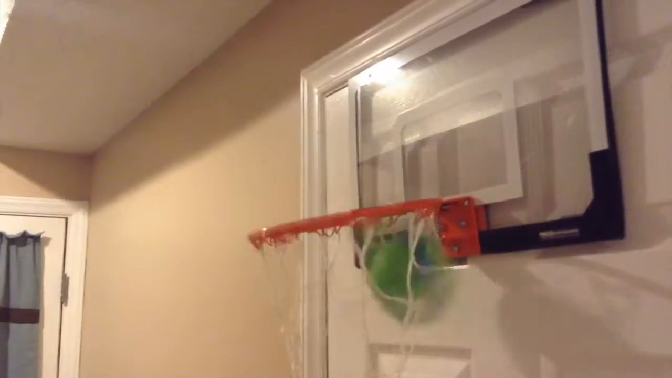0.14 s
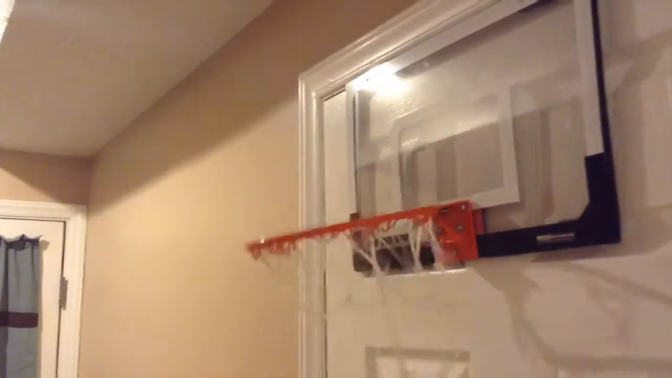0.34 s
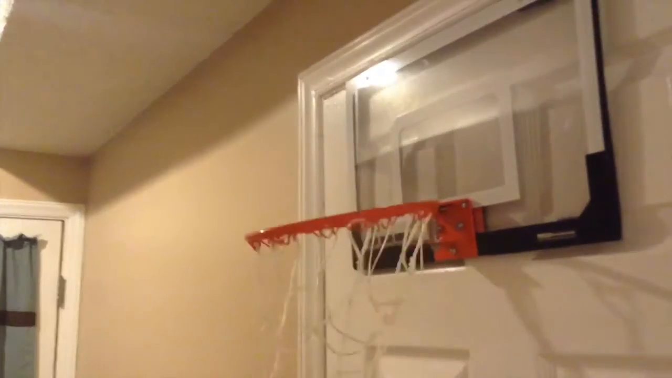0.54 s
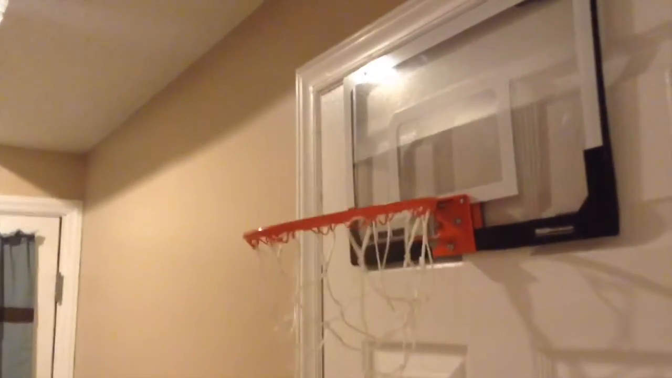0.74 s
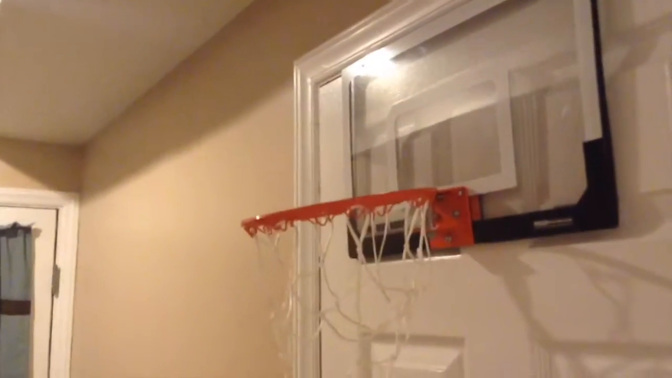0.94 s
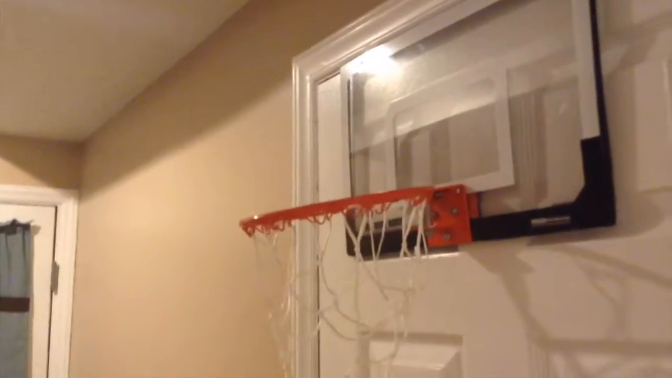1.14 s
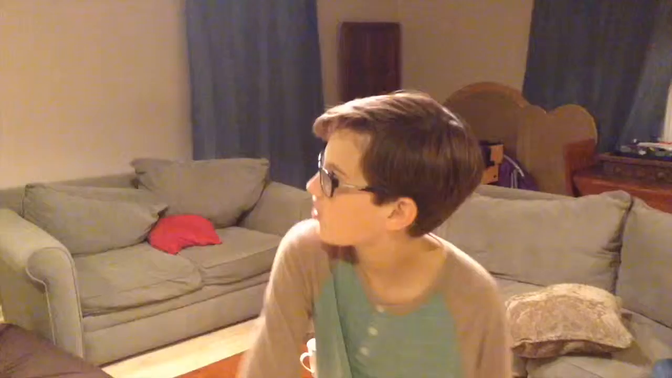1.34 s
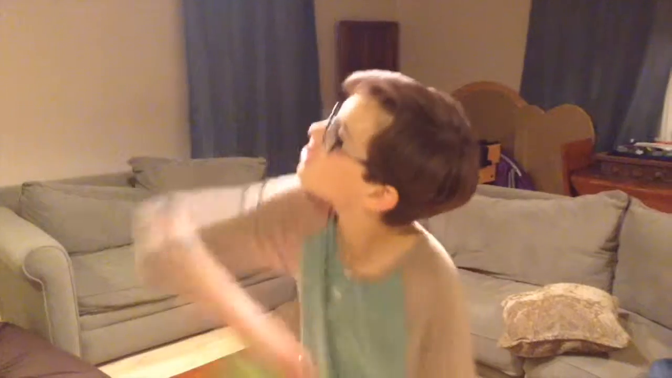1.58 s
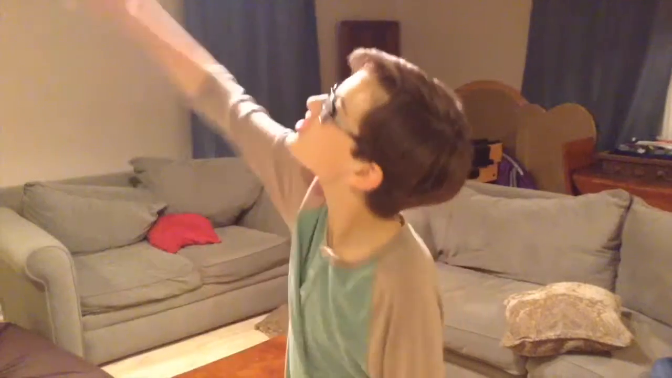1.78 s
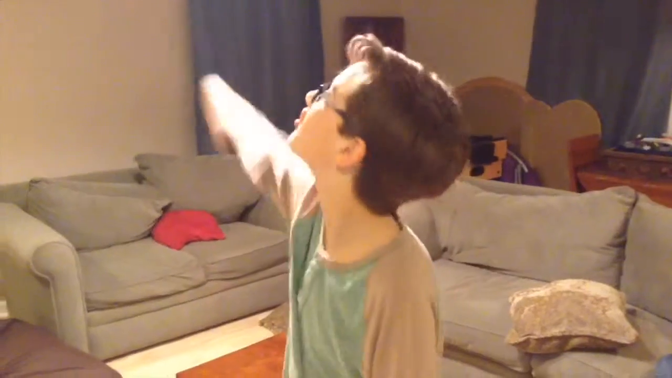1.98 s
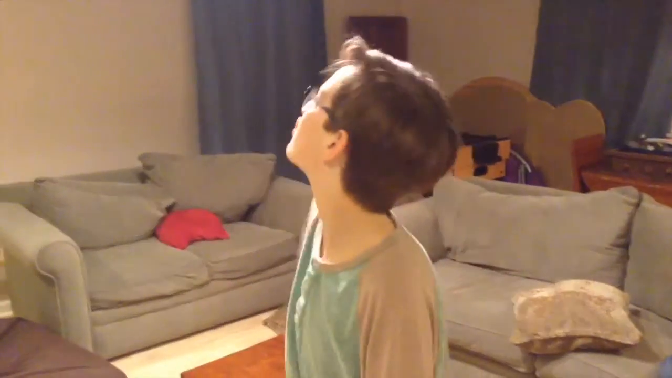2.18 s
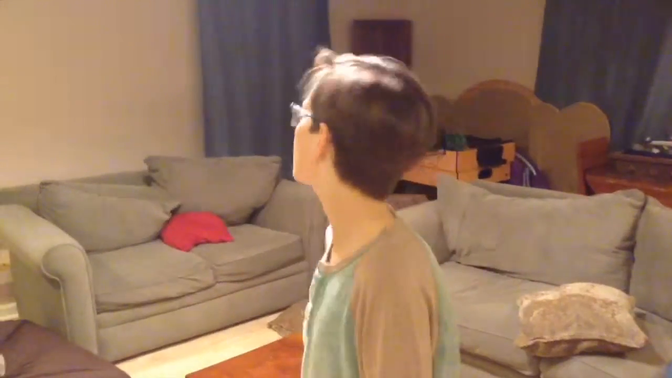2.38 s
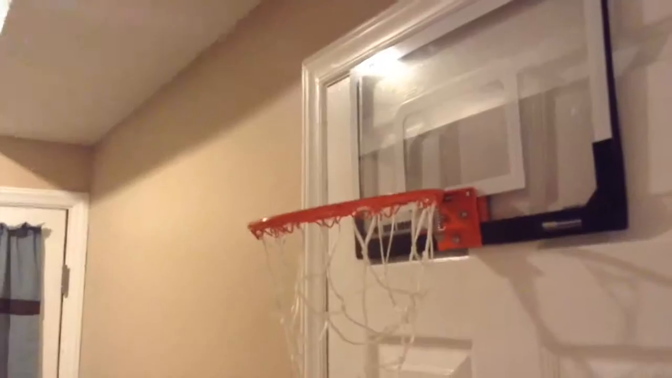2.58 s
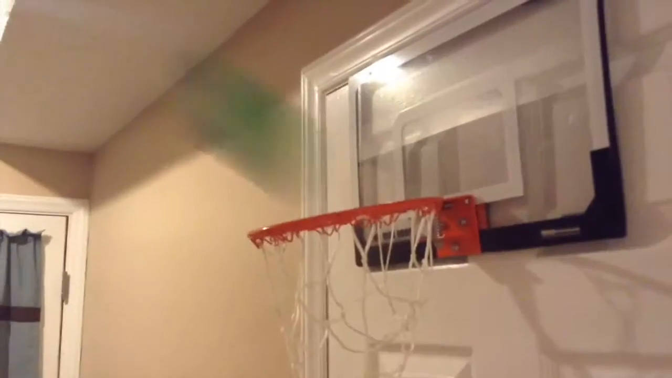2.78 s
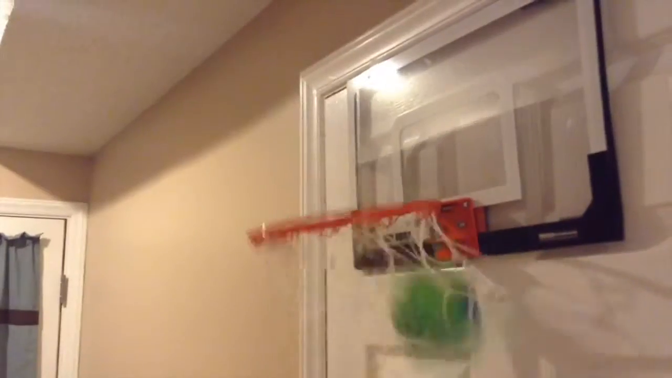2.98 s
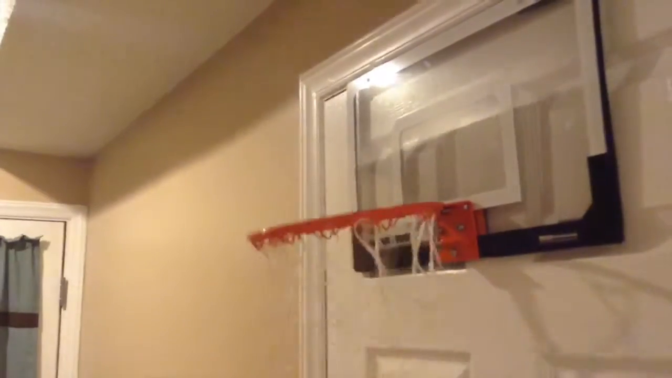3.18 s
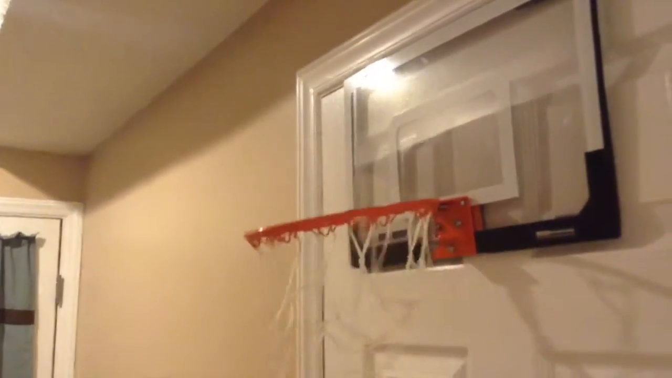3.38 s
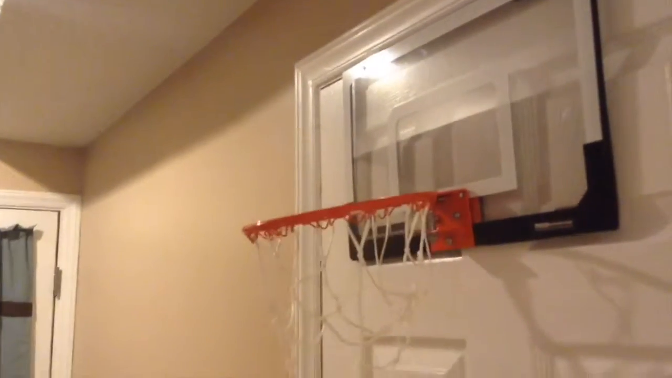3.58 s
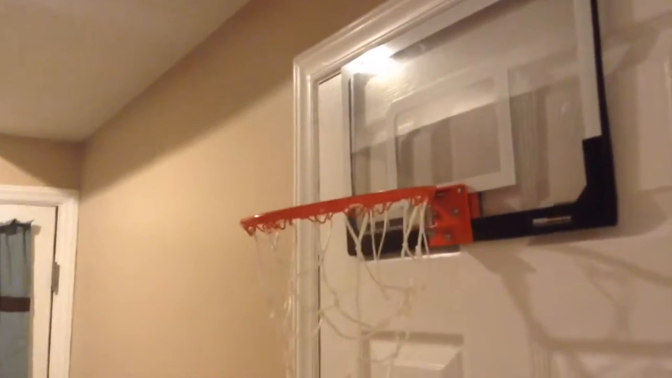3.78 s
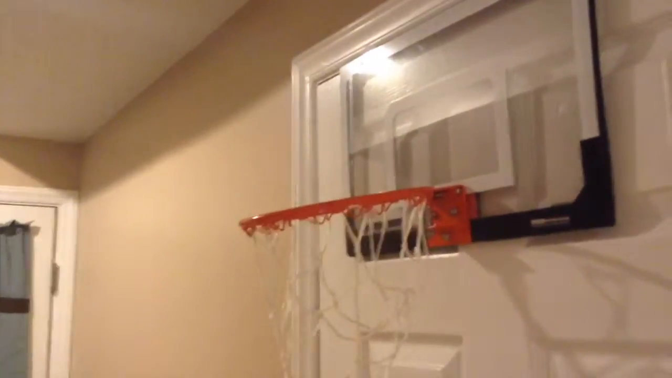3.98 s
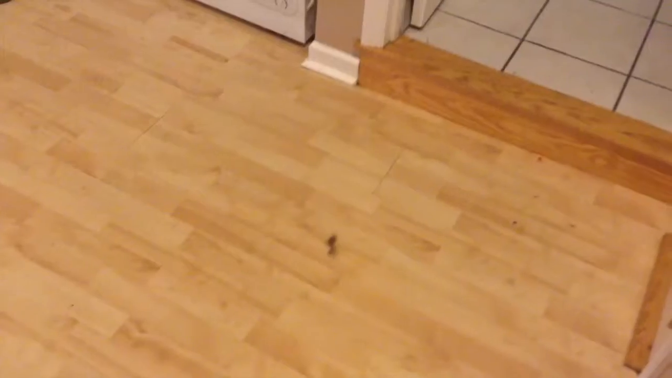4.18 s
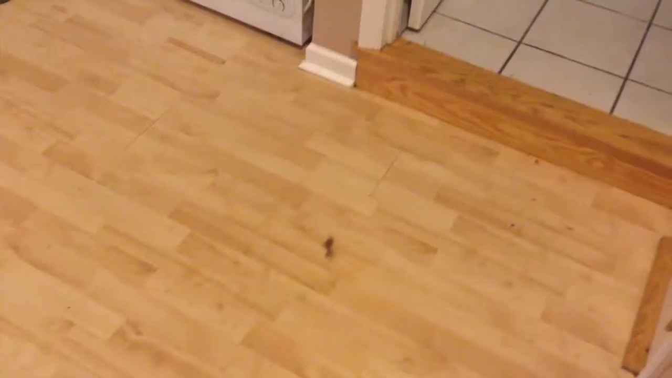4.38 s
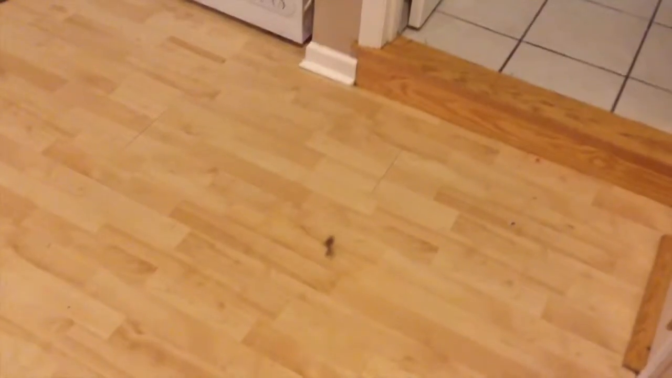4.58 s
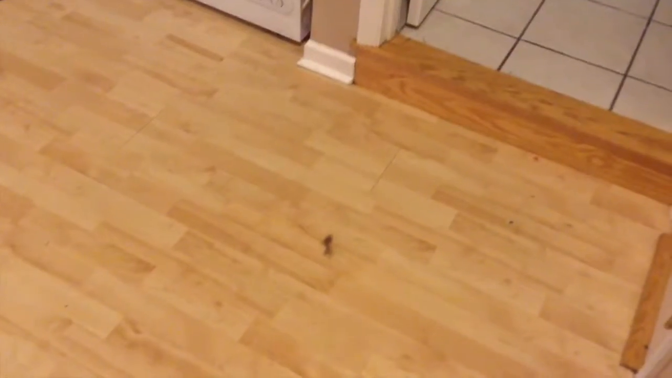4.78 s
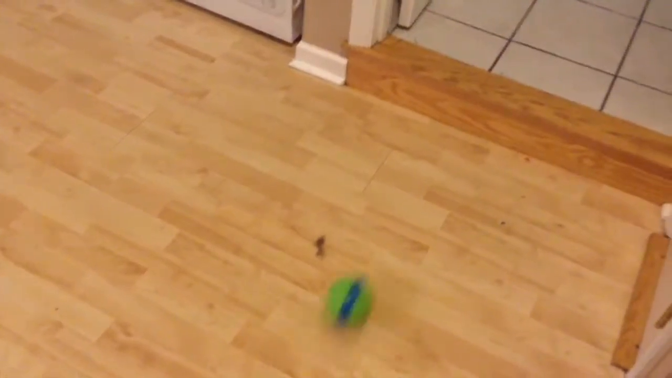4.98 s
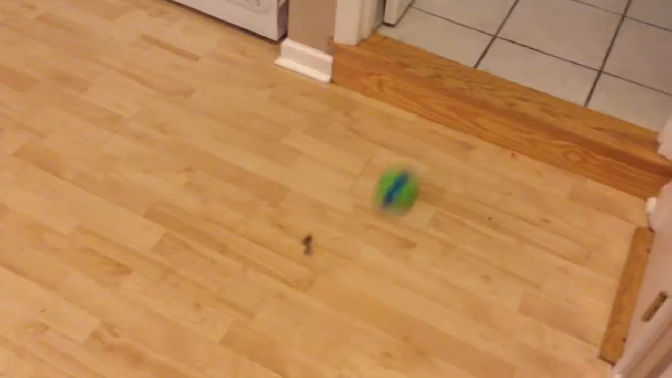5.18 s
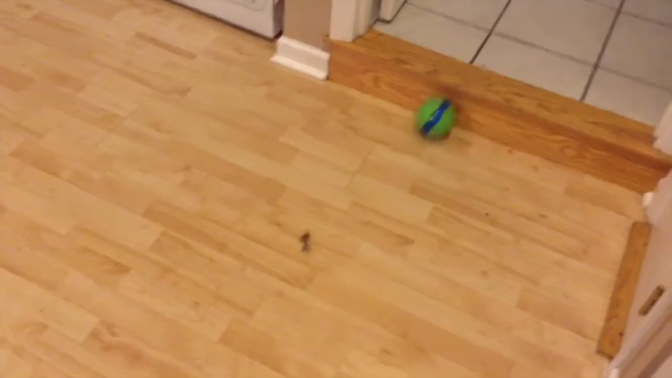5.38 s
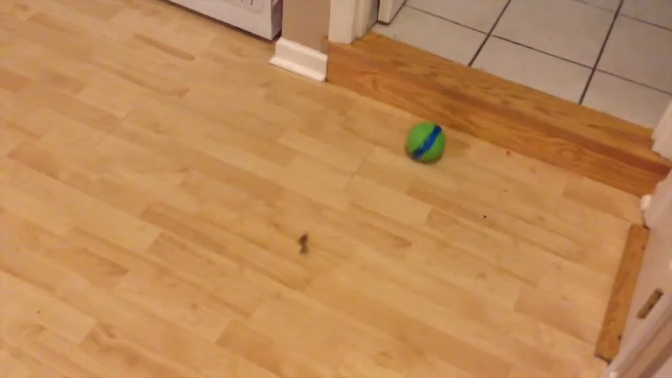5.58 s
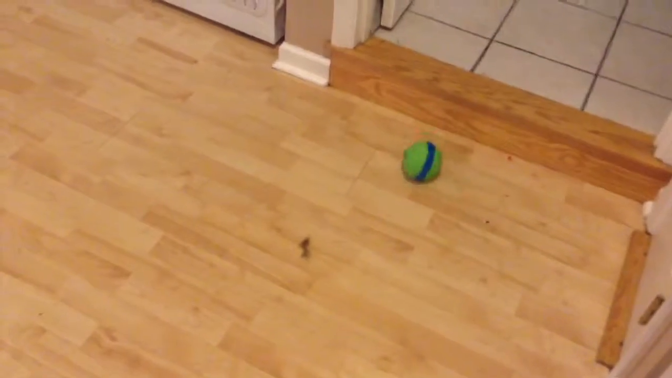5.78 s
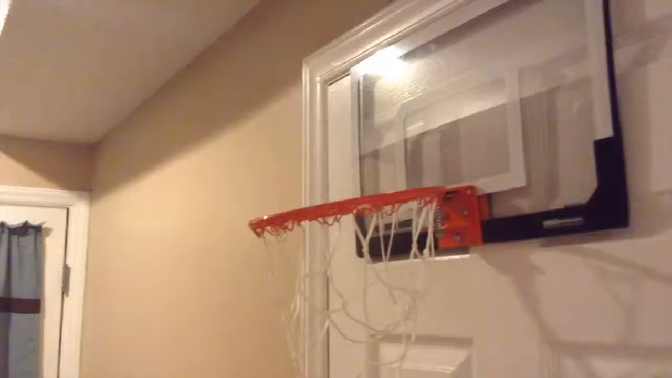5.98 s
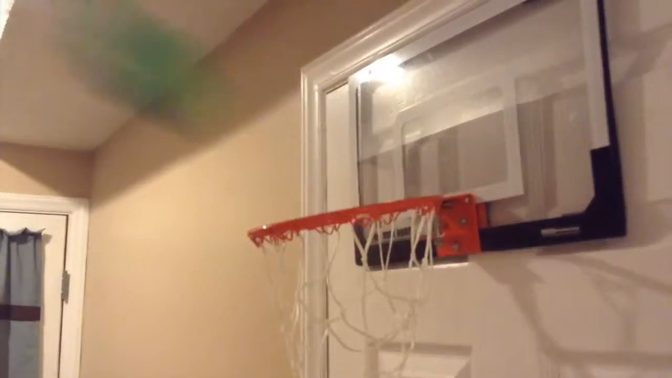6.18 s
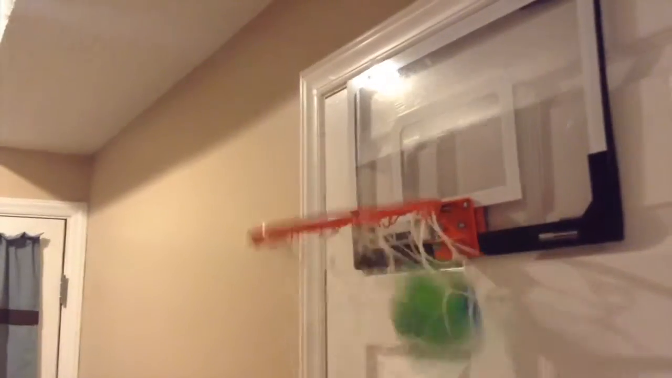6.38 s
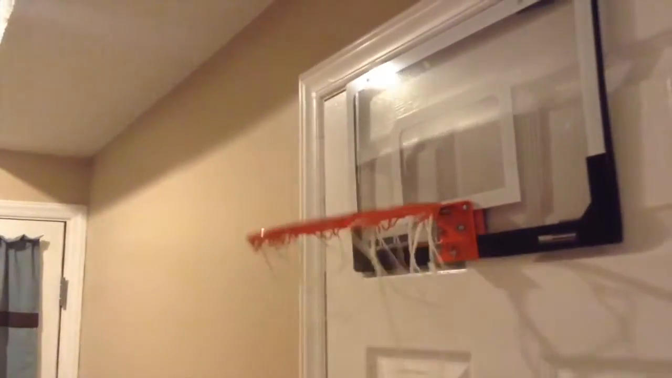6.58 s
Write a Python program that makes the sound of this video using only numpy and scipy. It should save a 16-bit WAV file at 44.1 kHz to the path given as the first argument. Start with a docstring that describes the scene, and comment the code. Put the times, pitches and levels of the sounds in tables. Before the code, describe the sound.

A small ball slaps a plastic hoop board, the rim rattles and the ball bounces, repeated, with floor bounces before a last cut-off shot.

```python
"""A small ball is thrown at a mini hoop on a living-room door: it slaps the plastic board, the sprung rim rattles,
the door knocks in its frame, and the ball drops and bounces. This one shot is laid down three times with quick fades;
the first starts partway in and the last is cut short. Between the last two, the ball bounces over a laminate floor to
a wooden sill. Each blow is a crack, a burst of fading noise, often ringing tones, and echoes from the room.
Soft rustles, light clicks and a faint swell of noise are heard too, over a wavering ventilation hum of coloured noise."""
import sys
import numpy as np
from scipy import signal
from scipy.fft import rfft, irfft
from scipy.io import wavfile
from scipy.ndimage import uniform_filter1d

SR = 44100
rng = np.random.default_rng(int(sys.argv[2]) if len(sys.argv) > 2 else 0)


def wav_out(sig):
    """Save sig, one row per channel (or a flat mono array), as 16-bit PCM at SR to the path in sys.argv[1]."""
    wavfile.write(sys.argv[1], SR, np.round(np.clip(np.atleast_2d(sig).T, -1, 1) * 32767).astype(np.int16))


N = 293265
TIME = np.arange(N) / SR
AGE = TIME[:2 ** 15]   # seconds since a blow
BINS_HZ = np.fft.rfftfreq(2 ** 12, 1 / SR)   # frequencies at which a colour is worked out
SHOT_START_S, SHOT_END_S = 2.527, 4.129   # where the shot sits before it is copied

# In every "tone" table only the shape of the spectrum counts: its overall power is evened out later.
# In every "modes" table the strength is relative to the blow, before the ring_db and a little chance are added.

# When the copies of the shot play. Each entry: shift in seconds.
REPLAY_SHIFTS_S = [-2.7361, 0, 3.43674]

# Colour of the background in the living room. Each row: frequency in Hz, relative strength in dB.
ROOM_HUM_TONE = [(24, -84.5), (40, -56.5), (106, -26.5), (146, -9.5), (266, -2), (350, -6), (417, -21.5),
                 (621, -15.5), (949, -19.5), (1080, -23), (1190, -18.5), (3140, -35), (5580, -35),
                 (6980, -42.5), (15500, -43)]
# Colour of the background by the sill. Each row: frequency in Hz, relative strength in dB.
SILL_HUM_TONE = [(24, -70), (40, -44), (114, -28), (179, -3), (241, -8.5), (294, -6.5), (577, -26.5),
                 (637, -20.5), (817, -19.5), (1280, -25.5), (1680, -25.5), (4800, -36), (15500, -54.5)]


def ventilation(room_db=-54, sill_db=-51.5, wander_db=1, wander_per_s=6.5):
    """Moving air makes a low hum that swells and sags at random; it is a little louder by the sill."""
    knots = np.arange(0, TIME[-1] + 1, 1 / wander_per_s)
    wander = np.interp(TIME, knots, rng.standard_normal(len(knots)))
    room = from_db(room_db) * steady_noise(ROOM_HUM_TONE)
    sill = from_db(sill_db) * steady_noise(SILL_HUM_TONE)
    by_sill = (TIME > SHOT_END_S) & (TIME < SHOT_START_S + REPLAY_SHIFTS_S[-1])
    return from_db(wander_db * wander) * np.where(by_sill, sill, room)


# The ball leaving the fingers. Each row: start in seconds, level in dB, brightness in dB per octave,
# time to die by 60 dB in seconds, room level in dB.
RELEASE = [(2.595, -46, .3, 0.045, -1.8)]
# Colour of the fingers on the ball. Each row: frequency in Hz, relative strength in dB.
RELEASE_TONE = [(400, -21), (1500, -2), (2500, -1), (3100, 0), (3800, -6), (4700, 2.5), (6200, -17),
                (7800, -11), (11000, -21), (15500, -19.5)]


def ball_release():
    """Fingers brush the ball: a short noise with hardly any crack."""
    return blows(RELEASE, RELEASE_TONE, crack_db=-15, echo_db=-3)


# Soft rustles, and last a long faint swell of background noise. Each row: start in seconds, level in dB,
# brightness in dB per octave, time to die by 60 dB in seconds, room level in dB.
RUSTLES = [(1.788, -49, 0.3, 0.094, 0.5), (2.147, -49, -2.4, 0.033, -19), (2.335, -50.5, 0.069, 0.061, 1.5),
           (2.720, -57, -1.7, 0.26, 3)]
# Colour of both. Each row: frequency in Hz, relative strength in dB.
RUSTLE_TONE = [(50, -36), (200, -7), (700, 8.5), (1500, -1), (2500, -2), (4500, -14), (7000, -24),
               (15000, -23)]


def rustles_and_swell():
    """Soft rustles and one long faint swell: bursts of noise with hardly any crack."""
    return blows(RUSTLES, RUSTLE_TONE, crack_db=-10, echo_db=9)


# The ball on the board. Each row: start in seconds, level in dB, brightness in dB per octave,
# time to die by 60 dB in seconds, room level in dB.
BOARD_HITS = [(2.9132, -16.5, 0, 0.078, -12.5), (2.926, -16, 4, 0.056, -6.5),
              (2.940, -8, -1.53, 0.038, -10.5)]
# Colour of the plastic board. Each row: frequency in Hz, relative strength in dB.
BOARD_TONE = [(50, -46), (100, -25.5), (160, -10.5), (380, -14.5), (570, -3), (920, -0.5), (1390, -9.5),
              (1690, -6), (1900, -11), (2480, -7), (3080, -17), (3600, -9.5), (6700, -18.5), (14500, -30)]
# Ringing tones of the hoop. Each row: frequency in Hz, strength in dB, time to die by 60 dB in seconds.
HOOP_MODES = [(165, -20, .3), (231, -15, .45), (686, -14, .4), (760, -17, .3), (843, -13, .32),
              (932, -12, .3), (1007, -15, .25), (1091, -16, .3), (1394, -21, .25), (2489, -16, .33),
              (3432, -19, .28), (4377, -19, .18), (5389, -21, .16), (6240, -20, .17), (8900, -22, .15)]


def board():
    """The ball slaps the plastic board and sets the hoop ringing."""
    return blows(BOARD_HITS, BOARD_TONE, HOOP_MODES, crack_db=3.5, echo_db=6.5, ring_db=-1.5)


# The rim chattering on its spring. Each row: start in seconds, level in dB, brightness in dB per octave.
RIM_RATTLES = [(2.953, -11.5, -2.2), (2.959, -11.5, -1.1), (2.968, -12, 1.15), (2.993, -23.5, 1.2)]
# Colour of the rim. Each row: frequency in Hz, relative strength in dB.
RIM_TONE = [(180, -43), (300, -14), (492, -13), (821, 3), (1280, -12), (2520, -5), (3230, -9), (5300, -3.5),
            (11000, -13.5), (14300, -16), (15500, -14)]


def rim():
    """The rim chatters on its spring in a quick run of knocks."""
    rows = alike(RIM_RATTLES, body_t60=.052, room_db=-16.5)
    return blows(rows, RIM_TONE, crack_db=11.5, echo_db=16)


# The rim settling back. Each row: start in seconds, level in dB, brightness in dB per octave.
SPRING_TICKS = [(3.070, -36, 0.2), (3.154, -31, 0.4), (3.166, -42, .3), (3.200, -46.5, -0.4)]
# Colour of the spring. Each row: frequency in Hz, relative strength in dB.
SPRING_TONE = [(300, -32.5), (1800, -21.5), (2500, 8.5), (3600, -0.5), (5000, 4.5), (7200, -9), (9000, 2.5),
               (11500, -20.5), (14800, -6.5)]


def spring():
    """The spring ticks thinly as the rim settles back."""
    rows = alike(SPRING_TICKS, body_t60=0.049, room_db=-13)
    return blows(rows, SPRING_TONE, crack_db=12, echo_db=6)


# The door against its latch. Each row: start in seconds, level in dB, brightness in dB per octave.
DOOR_KNOCKS = [(3.2975, -32.5, -.5), (3.362, -38, 1.9), (3.451, -35, -.3)]
# Colour of the door. Each row: frequency in Hz, relative strength in dB.
DOOR_TONE = [(60, -47), (120, -20), (225, 0), (380, -5), (440, -18.5), (590, 0), (800, -10.5), (1150, -12),
             (1600, -20.5), (2500, -23), (4000, -34.5), (9000, -55)]
# Ringing tones of the door. Each row: frequency in Hz, strength in dB, time to die by 60 dB in seconds.
DOOR_MODES = [(245, -6.5, 0.37), (505, -14, 0.31), (592, -11, .2), (790, -14, 0.16), (1201, -21.5, .15)]


def door():
    """The door rocks against its latch and rings low and briefly."""
    rows = alike(DOOR_KNOCKS, body_t60=.055, room_db=-8)
    return blows(rows, DOOR_TONE, DOOR_MODES, crack_db=11.5, echo_db=8.0, ring_db=5.5)


# The ball landing at the foot of the door. Each row: start in seconds, level in dB,
# brightness in dB per octave, time to die by 60 dB in seconds, room level in dB.
LANDINGS = [(3.5205, -5.5, -.5, 0.029, -8.5), (3.531, -13, 0.15, .07, -8.5), (3.547, -16, 0.53, 0.12, -5.5)]
# Colour of the landing. Each row: frequency in Hz, relative strength in dB.
LANDING_TONE = [(41, -65.5), (70, -34.5), (254, -12.5), (511, -10.5), (560, -9.5), (641, -3.5), (899, -6),
                (1130, -2), (1690, -9), (2540, -6.5), (3490, -8), (5480, -7), (6420, -12), (13800, -18),
                (15500, -33.5)]
# Ringing tones of the landing. Each row: frequency in Hz, strength in dB, time to die by 60 dB in seconds.
LANDING_MODES = [(205, -24, .3), (260, -18, .3), (350, -22, .35), (635, -19, .33), (767, -12, .25),
                 (1104, -15, .3), (1161, -14, .35), (1199, -16, .35), (1377, -16, .35), (2543, -19, .2),
                 (3250, -22, .24), (4380, -19, .18), (5321, -17, .24)]


def landing():
    """The ball lands with a clatter at the foot of the door."""
    return blows(LANDINGS, LANDING_TONE, LANDING_MODES, crack_db=17, echo_db=8.0, ring_db=0.5)


# The next bounce. Each row: start in seconds, level in dB, brightness in dB per octave,
# time to die by 60 dB in seconds, room level in dB.
REBOUNDS = [(3.9472, -18, -0.44, 0.031, -0.094)]
# Colour of the rebound. Each row: frequency in Hz, relative strength in dB.
REBOUND_TONE = [(41, -34), (70, -29.5), (224, -17.5), (366, -8), (447, -8.5), (489, -12), (547, -4.5),
                (800, -8), (935, -2), (1460, -8), (2560, -3.5), (3120, -6), (5220, -7.5), (14600, -18.5)]
# Ringing tones of the rebound. Each row: frequency in Hz, strength in dB, time to die by 60 dB in seconds.
REBOUND_MODES = [(548, -8.5, 0.25), (775, -2, 0.083), (1133, -13, 0.24), (1327, -9, 0.12),
                 (2600, -15.5, 0.38)]


def rebound():
    """The dropped ball bounces once more."""
    return blows(REBOUNDS, REBOUND_TONE, REBOUND_MODES, crack_db=9, echo_db=18, ring_db=3.0)


# Light clicks. Each row: start in seconds, level in dB, pitch in Hz.
CLICKS = [(4.409, -48, 9000), (4.44, -46.5, 1960), (5.076, -28.5, 8650), (5.187, -30.5, 3040),
          (5.206, -30.5, 4980), (5.356, -33, 3450), (5.629, -40, 4500)]
# Colour of one click. Each row: multiple of its pitch, relative strength in dB.
CLICK_SHAPE = [(.05, -40), (.3, -14), (.6, -7.5), (0.849, -9), (1.1, -2.5), (1.3, -21), (2.0, -18),
               (5.0, -38.5)]


def clicks():
    """Small hard things click, each with its noise gathered around one pitch."""
    out = np.zeros(N)
    for s, db, hz in CLICKS + faint_ticks():
        tone = np.array(CLICK_SHAPE) * [hz, 1]
        rows = alike([(s, db, 0)], body_t60=0.025, room_db=-11.5)
        out += blows(rows, tone, crack_db=15, echo_db=4)
    return out


# The loose ball on the laminate, squarely and then glancingly. Each row: start in seconds, level in dB,
# brightness in dB per octave, time to die by 60 dB in seconds, room level in dB.
FLOOR_BOUNCES = [(4.778, -15, 0.14, 0.025, -5), (5.058, -23, .3, 0.083, -0.5)]
# Colour of the square bounce. Each row: frequency in Hz, relative strength in dB.
SMACK_TONE = [(47, -63.5), (80, -38), (233, -17), (271, -30), (410, -7.5), (707, -8), (841, -1),
              (1050, -12), (1140, -10), (1390, -9.5), (2100, -13), (2340, -10), (2560, -9.5), (4220, -7.5),
              (14600, -29)]
# Colour of the glancing bounce. Each row: frequency in Hz, relative strength in dB.
SKIP_TONE = [(120, -57), (200, -15), (362, -10.5), (473, -15), (556, -10.5), (742, 0.5), (1390, -8.5),
             (2430, -7), (3010, -16), (3470, -11.5), (6060, -18.5), (6750, -25.5), (14600, -25.5)]
# Ringing tones of both bounces. Each row: frequency in Hz, strength in dB, time to die by 60 dB in seconds.
BALL_MODES = [(418, -12, 0.12), (545, -8.5, 0.1), (631, -7, 0.17), (824, -4.5, 0.33), (967, -9, 0.5),
              (1055, -17, 0.24), (2240, -24, 0.45), (2363, -16, 0.51), (3660, -8, 0.2)]


def floor_bounces():
    """The ball smacks the laminate squarely, then glancingly with a weaker crack."""
    square, glancing = FLOOR_BOUNCES
    smack = blows([square], SMACK_TONE, BALL_MODES, crack_db=24, echo_db=11, ring_db=-0.5)
    skip = blows([glancing], SKIP_TONE, BALL_MODES, crack_db=15, echo_db=10, ring_db=-0.5)
    return smack + skip


def faint_ticks(count=5, first_s=5.28, last_s=5.80, pitch_hz=7940, spread_octaves=0.66):
    """Ticks fall at random, ever weaker, while the loose ball runs out: start in s, level in dB, pitch in Hz."""
    place, pitch = rng.random((count, 2)).T
    after = (last_s - first_s) * (np.arange(count) + place) / count   # one tick in each equal slice of time
    levels_db = -44 - 22 * after   # falls by 22 dB per second
    pitches_hz = pitch_hz * 2 ** (spread_octaves * (2 * pitch - 1))
    return list(zip(first_s + after, levels_db, pitches_hz))


# The ball on the wooden sill. Each row: start in seconds, level in dB, brightness in dB per octave,
# time to die by 60 dB in seconds, room level in dB.
SILL_HITS = [(5.414, -16.5, -0.5, 0.066, -9.5), (5.428, -15, 6, 0.04, -12.5),
             (5.524, -27.5, 0.5, 0.096, -7.5), (5.554, -33, 4.5, 0.053, -15)]
# Colour of the sill. Each row: frequency in Hz, relative strength in dB.
SILL_TONE = [(60, -47), (150, -31), (290, -5), (350, 1), (480, 0), (570, -1), (650, -4.5), (950, 0),
             (1300, -8.5), (2200, -6.5), (3000, -14), (3750, -11.5), (7000, -21.5), (14600, -30)]
# Ringing tones of the sill. Each row: frequency in Hz, strength in dB, time to die by 60 dB in seconds.
SILL_MODES = [(373.6, -4.5, 0.18), (400, -28, 0.5), (542, -12, 0.32), (567, -23, 0.36), (760, -11, 0.64),
              (950, -18.5, 0.96), (2460, -22, 0.75), (3680, -16, 0.17)]


def sill():
    """The ball thumps the wooden sill, which rings on faintly."""
    return blows(SILL_HITS, SILL_TONE, SILL_MODES, crack_db=10.0, echo_db=0, ring_db=-5.0)


def blows(rows, tone, modes=(), crack_db=10, echo_db=5, ring_db=0):
    """Each sound is a crack, a short dense buzz of the body, any ringing modes and the room's answer."""
    out = np.zeros(N + len(AGE))
    # the minor resonances set in gradually around 710 Hz
    ripple_db = 3 * fine_resonances() * BINS_HZ / (BINS_HZ + 710)
    for s, db, brightness, body_t60, room_db in rows:
        contact = rng.standard_normal(len(AGE)) * dying(body_t60)
        contact[0] += from_db(crack_db)
        room = from_db(room_db) * (room_tail() + from_db(echo_db) * first_echoes())
        response = colour(tone, brightness, ripple_db)
        sound = signal.fftconvolve(contact + room, response)[:len(AGE)]
        for hz, mode_db, t60 in modes:
            # each mode's strength varies a little by chance from blow to blow
            strength = from_db(ring_db + mode_db + rng.normal(0, 1))
            sound += strength * mode(hz, t60)
        start = round(s * SR)
        out[start:start + len(AGE)] += from_db(db) * sound
    return out[:N]


def alike(rows, body_t60, room_db):
    """Blows on one object share its decay and its distance."""
    return [(*row, body_t60, room_db) for row in rows]


def mode(hz, t60, count=3, split_hz=5, swell_t60=0.012):
    """A few close partials start together and beat as they die; each tone swells in over a few milliseconds."""
    partials = hz + rng.normal(0, split_hz, (count, 1))
    phase = rng.uniform(0, 2 * np.pi)
    wave = np.cos(2 * np.pi * partials * AGE + phase).mean(axis=0)
    return wave * dying(t60) * (1 - dying(swell_t60))


def fine_resonances(size=5):
    """Countless minor modes of a body ripple its spectrum with peaks some tens of Hz wide; spread 1."""
    smoothed = uniform_filter1d(rng.standard_normal(len(BINS_HZ)), size)
    return rms_one(uniform_filter1d(smoothed, size))


# How long the room echoes. Each row: frequency in Hz, time to die by 60 dB in seconds.
ROOM_T60 = [(150, 0.83), (400, 0.52), (1000, 0.52), (2700, 0.46), (5000, 0.39), (8000, 0.37), (15000, 0.25)]


def room_tail(build_s=0.014):
    """Dense reflections build up over a few milliseconds and die sooner in the treble."""
    white = rfft(rng.standard_normal(len(AGE)))
    hz = np.fft.rfftfreq(len(AGE), 1 / SR)
    centres, t60s = np.transpose(ROOM_T60)
    tail = np.zeros(len(AGE))
    for one, t60 in zip(np.eye(len(centres)), t60s):
        share = at_hz(np.column_stack([centres, one]), hz)   # overlapping bands that add up to 1
        tail += irfft(white * share) * dying(t60)
    return tail * (1 - np.exp(-AGE / build_s))


def first_echoes(count=6, earliest_s=.004, latest_s=0.025):
    """Distinct slaps off the nearest walls, floor and ceiling."""
    echoes = np.zeros(len(AGE))
    places = (rng.uniform(earliest_s, latest_s, count) * SR).astype(int)
    echoes[places] = rng.uniform(.5, 1, count)
    return echoes


def steady_noise(tone):
    """Unending noise of one colour, with an rms of 1."""
    return rms_one(signal.fftconvolve(rng.standard_normal(N), colour(tone))[:N])


def colour(tone, brightness=0, ripple_db=0):
    """Causal (minimum-phase) response with the given spectrum; white noise keeps its power."""
    octaves = np.log2(np.maximum(BINS_HZ, 200) / 1000)   # tilts about 1 kHz
    gain = rms_one(from_db(at_hz(tone, BINS_HZ) + brightness * octaves + ripple_db))
    cepstrum = irfft(np.log(gain))
    # folding the cepstrum onto its first half packs the energy at the start
    half = len(cepstrum) // 2
    cepstrum[1:half] *= 2
    cepstrum[half + 1:] = 0
    return irfft(np.exp(rfft(cepstrum)))


def at_hz(points, hz):
    """Read a table on a log-frequency axis."""
    freq, value = np.transpose(points)
    return np.interp(np.log(np.maximum(hz, 1)), np.log(freq), value)


def dying(t60):
    """Exponential decay from 1, down by 60 dB after t60 seconds."""
    return np.exp(-np.log(1000) * AGE / max(t60, 1e-3))


def from_db(db):
    """Decibels to gain."""
    return 10 ** (np.asarray(db) / 20)


def rms_one(x):
    """Scale to an rms of 1."""
    return x / np.sqrt(np.mean(x ** 2) + 1e-20)


def joins(fade_out_s=.036, fade_in_s=.026, dropout_s=4.529, silence_s=.035, edge_s=0.0034):
    """Gain that fades to silence and back at both ends of every shot, and drops out once."""
    from_middle = np.abs(TIME - dropout_s)
    gain = np.clip((from_middle - silence_s / 2) / edge_s, 0, 1)
    for s in np.add.outer(REPLAY_SHIFTS_S, [SHOT_START_S, SHOT_END_S]).ravel():
        gain *= np.clip(np.maximum((s - TIME) / fade_out_s, (TIME - s) / fade_in_s), 0, 1)
    return gain


def scene():
    """The shot is cut out and laid down three times; the other sounds happen once."""
    in_shot = (TIME > SHOT_START_S) & (TIME < SHOT_END_S)
    hum = ventilation()
    small = ball_release() + rustles_and_swell() + clicks()
    hoop = board() + rim() + spring() + door()
    dropping_ball = landing() + rebound()
    shot = (hoop + dropping_ball + small) * in_shot
    loose_ball = floor_bounces() + sill()
    samples = np.arange(N)
    replays = sum(np.interp(samples - round(shift * SR), samples, shot) for shift in REPLAY_SHIFTS_S)
    mix = replays + loose_ball + small * ~in_shot + hum
    return (mix * joins())[None]


def record(dry, low_cut_hz=70, top_cut_hz=15550):
    """A small microphone loses the deep bass, the loudest peaks overload and the top is cut."""
    high_pass = signal.butter(1, low_cut_hz, "high", fs=SR, output="sos")
    thin = signal.sosfilt(high_pass, dry)
    overloaded = np.clip(thin, -.8, .8)
    low_pass = signal.ellip(10, .1, 80, top_cut_hz, fs=SR, output="sos")
    return signal.sosfilt(low_pass, overloaded)


dry = scene()
out = record(dry)
wav_out(out)
```